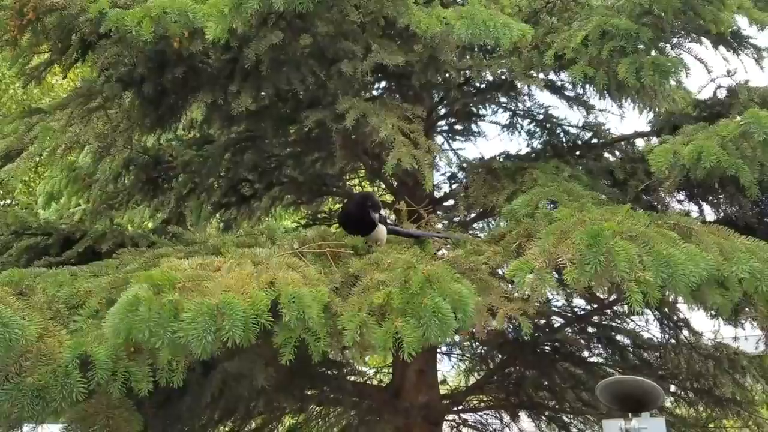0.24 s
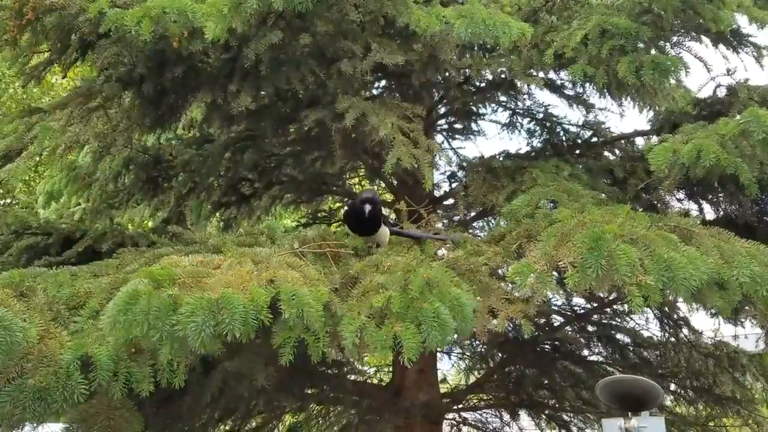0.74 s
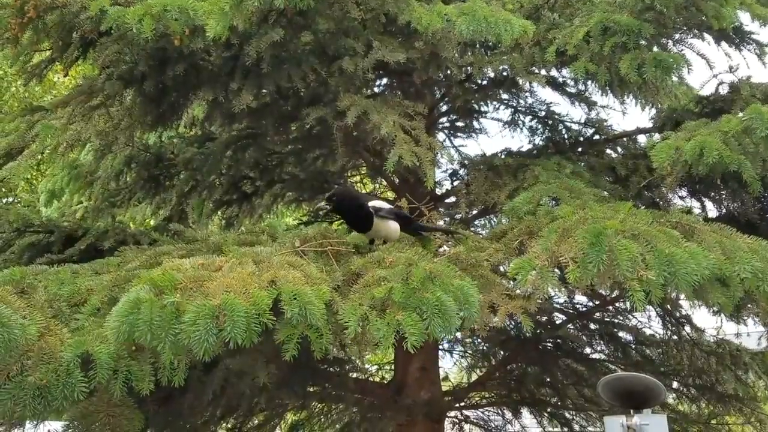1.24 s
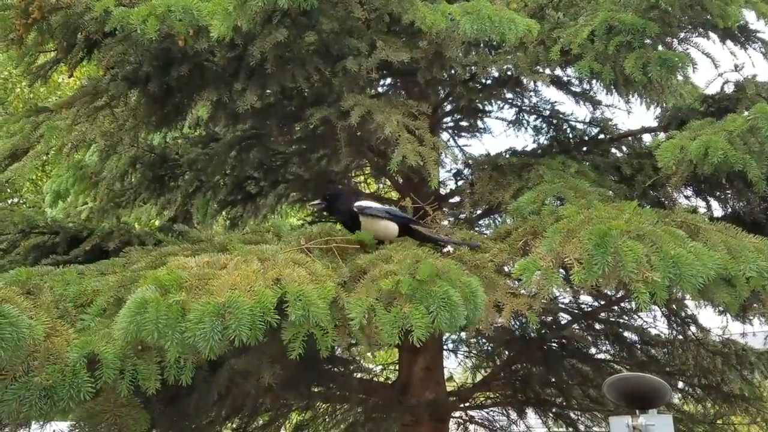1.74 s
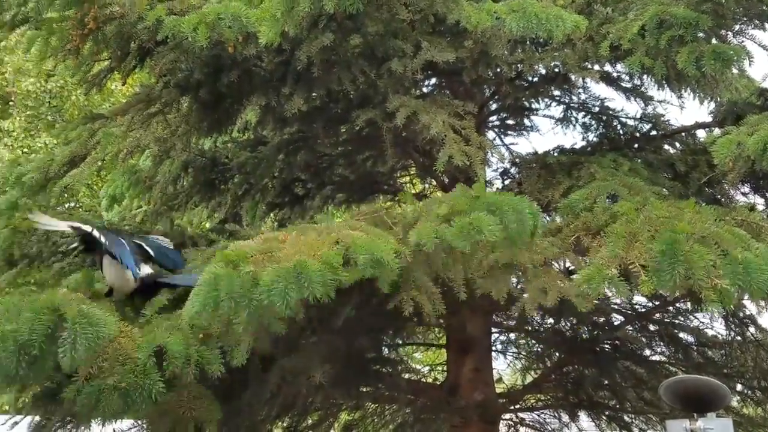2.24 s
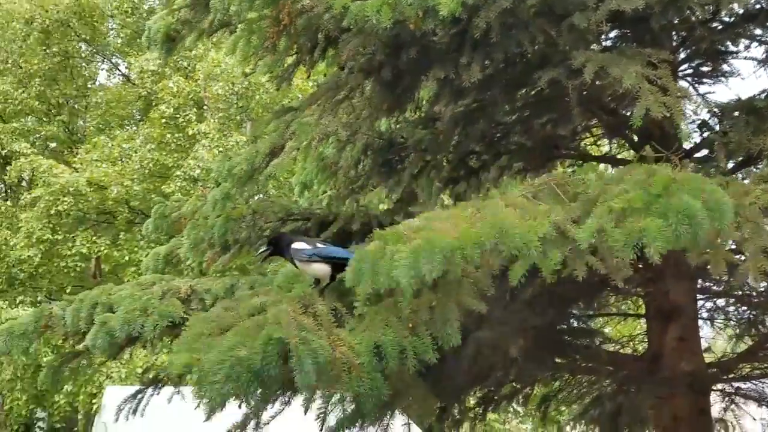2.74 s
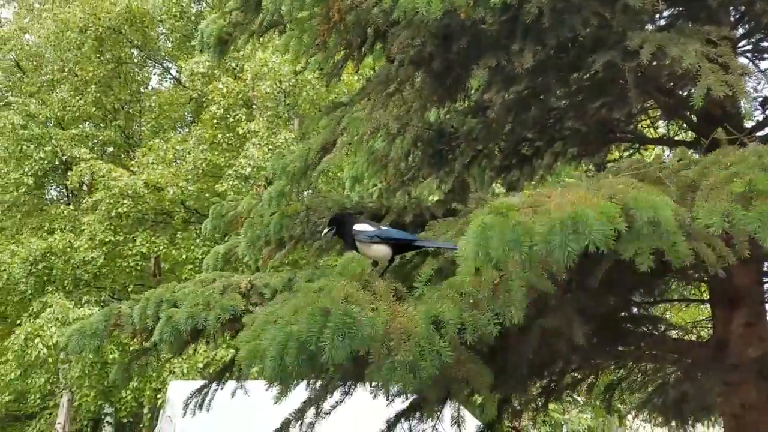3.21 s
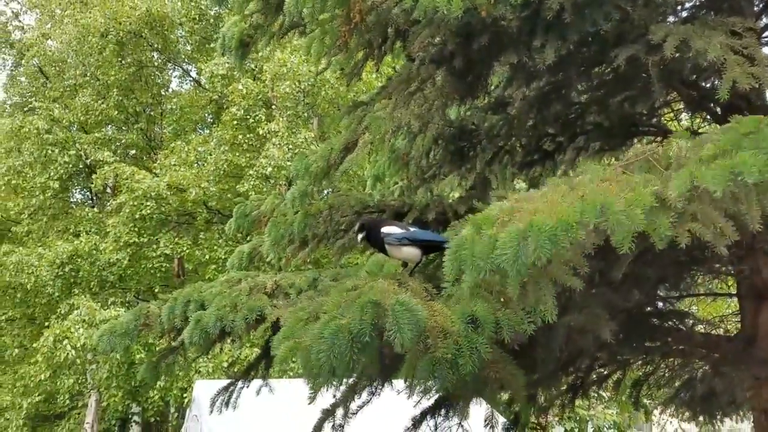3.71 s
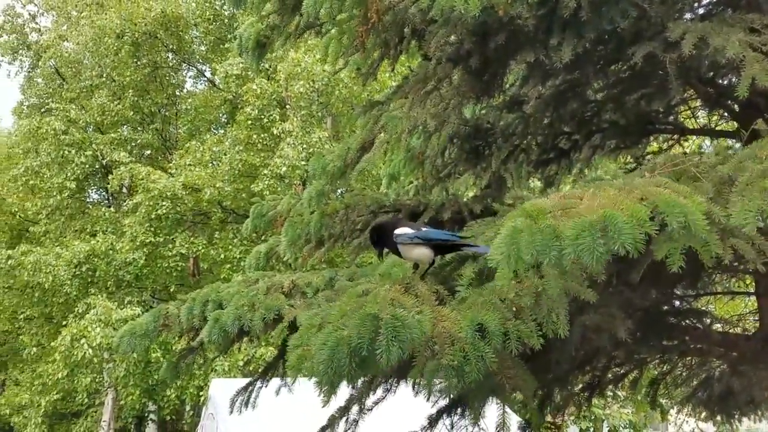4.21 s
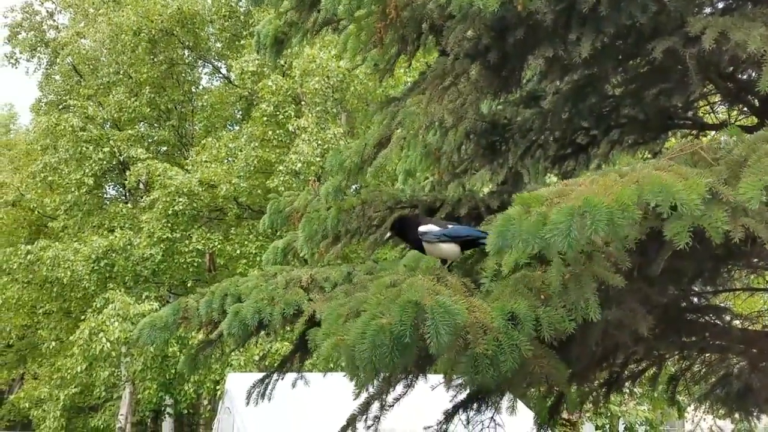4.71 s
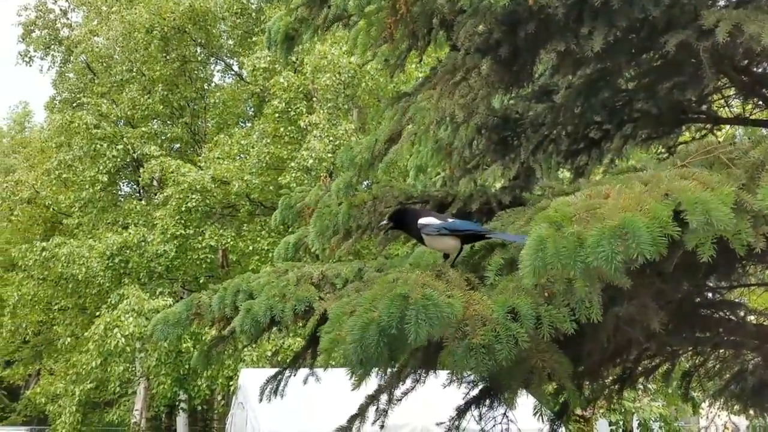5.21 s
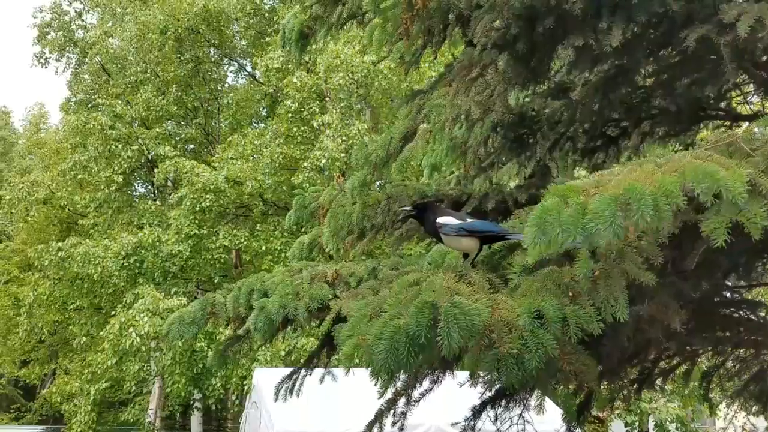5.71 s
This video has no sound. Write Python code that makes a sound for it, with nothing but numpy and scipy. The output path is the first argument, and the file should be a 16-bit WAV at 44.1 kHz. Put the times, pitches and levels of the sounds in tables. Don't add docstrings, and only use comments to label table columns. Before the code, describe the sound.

A magpie in a spruce chatters harshly in two runs while a fainter second one rattles farther off, over a low hum and soft town air.

```python
import sys
import numpy as np
from scipy import signal
from scipy.fft import rfft, irfft, next_fast_len
from scipy.io import wavfile
from scipy.ndimage import uniform_filter1d

SR = 44100
rng = np.random.default_rng(int(sys.argv[2]) if len(sys.argv) > 2 else 0)


def volts_from_decibels(level):
    exponent = np.asarray(level, float) / 20
    return 10 ** exponent


def store_wav(level_fs):
    pcm = np.round(np.clip(np.atleast_2d(level_fs), -1, 1) * 32767)
    wavfile.write(sys.argv[1], SR, pcm.T.astype(np.int16))


N = 262395

# start in seconds, length in seconds, level in dB,
# gain from the head turning toward the phone in dB, top pitch in Hz.
NEAR_CALLS = [(1.076, 0.17, -24, -1.5, 618), (1.314, 0.17, -24, -5, 698.6), (1.546, 0.17, -25.5, -6, 702.2),
              (1.766, 0.16, -24.5, -1.5, 709), (1.977, 0.15, -24.5, -5.5, 724.3),
              (2.223, 0.15, -25.5, -3.5, 687), (2.462, 0.15, -24, -4.5, 697),
              (2.690, 0.15, -24, -3.5, 676.6), (2.916, 0.15, -23, -0.9, 690.3),
              (3.146, 0.14, -23.5, -2, 700.3), (3.386, 0.15, -23.5, -1.5, 712),
              (5.084, 0.185, -26, -3.5, 662), (5.322, 0.15, -24, -2.5, 692), (5.536, 0.15, -24, -2, 734),
              (5.776, 0.14, -24, -2, 714.3)]
# start in seconds, level in dB.
FAR_CALLS = [(0.695, -42), (.916, -37.5), (1.135, -36), (1.355, -39), (1.575, -36.5), (1.794, -38.5),
             (2.015, -36), (2.245, -35.5), (2.474, -36), (2.704, -38)]
# frequency in Hz, width in Hz, level in dB.
WINDPIPE_MODES = [(968, 260, -12), (1393, 372, -10.5), (1960, 770, -3.5)]
# frequency in Hz, width in Hz, level in dB.
NEAR_BEAK_MODES = [(4890, 1560, -3), (8330, 1850, -2.5), (11170, 530, -17), (13300, 5400, -24)]
FAR_BEAK_MODES = [(4870, 1870, -5), (7390, 2800, -6.5), (10440, 1600, -9.5), (13500, 3520, -20)]
# frequency in Hz, left minus right in dB.
PORT_LEVEL = [(60, 0.0), (92, -1.0), (140, -1.0), (210, 1.0), (330, 2.0), (500, 3.0), (770, 4.0),
              (1170, 5.0), (1790, 6.0), (2740, -1.5), (4190, -10.0), (6410, -6.5), (9810, -5.0),
              (15000, -1.5)]
# frequency in Hz, lead of the left in radians.
PORT_PHASE = [(0, 0), (860, 0.5), (3100, -0.5), (5430, 3.0), (6370, 2.0), (10100, 4.6), (12100, 9.6),
              (15500, 22.2), (15800, 19.3)]
# frequency in Hz, reverberation time T60 in seconds.
YARD_T60 = [(500, 0.46), (2000, 0.69), (5000, 0.53), (10000, 0.3)]
# time in seconds, level in dB.
MACHINE_LOAD = [(0.0, -50.5), (0.11, -44), (1.14, -47), (2.29, -42.5), (2.33, -45.5), (2.7, -43.5),
                (3.07, -48.5), (3.1, -43.5), (3.31, -49), (3.58, -41.5), (3.99, -46), (4.11, -41.5),
                (4.34, -49.5), (4.57, -43.5), (5.82, -43.5), (5.95, -49)]
# middle in seconds, peak in dB, half width in seconds.
SECOND_SWELLS = [(0.028, -48, 0.048), (2.22, -52, .06), (3.2, -51, 0.08), (3.53, -45, 0.053),
                 (3.84, -48.5, .15), (4.46, -46, 0.11), (4.9, -46, 0.13), (5.5, -73, .3)]
# multiple of half the main tone, level in dB, left minus right in dB.
WHINE_PARTIALS = [(5, -13, .4), (8, -10, 2.5), (9, -6, 3), (10, -8, 4), (11, -3, 5), (12, 0, 5),
                  (18, -17, 5), (24, -13, 5), (28, -15, 5)]
# time in seconds, level in dB.
WHINE_BREEZE = [(0, -51), (.3, -61.5), (.9, -55.5), (1.5, -50.5), (3.3, -54.5), (4.2, -49.5), (5.95, -49)]
# time in seconds, peak in dB, ring frequency in Hz.
TWIG_TICKS = [
    (0.049, -40.5, 6600),
    (0.415, -52, 4940),
    (0.4848, -52, 8240),
    (0.5094, -66, 5530),
    (0.563, -33.5, 8160),
    (0.5744, -42, 7960),
    (0.6174, -46, 8240),
]
# time in seconds, peak in dB.
NEEDLE_TICKS = [(4.4947, -62), (4.5069, -59), (4.5162, -54), (4.5236, -49), (4.5314, -61), (4.5471, -55),
                (4.5745, -50), (4.5856, -54), (4.5925, -50), (4.6064, -56)]
# frequency in Hz, density in dB per Hz.
EARLY_AIR = [(15, -58), (25, -22.5), (70, -42), (94, 2), (123, -16), (175, -17.5), (489, -18), (607, -18),
             (818, -26), (1480, -20), (6210, -49.5), (16000, -53.5)]
LATE_AIR = [(15, -53), (25, -16), (64, -8), (114, -3), (175, -9.5), (373, -16), (734, -12), (796, -17),
            (1480, -12), (2410, -21), (10100, -49.5), (16000, -44)]
# frequency in Hz, correlation as a plain number.
AIR_LIKENESS = [(60, 0.97), (130, 0.98), (290, 0.84), (640, 0.65), (1410, -0.05), (3100, 0.04),
                (6820, 0.01), (15000, -0.02)]
# frequency in Hz, left minus right in dB.
AIR_BALANCE = [(60, -1), (130, 3.5), (290, 1), (640, 8), (1410, 4.5), (3100, -2.5), (6820, -7), (15000, 3)]

# late swell dB, upper mode Hz, upper mode dB, fourth-partial pull dB, throat sweep dB, branch scatter dB
NEAR_BIRD = (-1.7, 2796, 3.5, -8, -17.5, -0.5)
FAR_BIRD = (3, 3042, -2.5, -9, -26, 3.5)
FAR_LENGTH_S, FAR_TURN_DB, FAR_HZ = .21, -4.5, 645.3
LEAD_IN_S = .006
UPPER_WIDTH_HZ, TUNED_WIDTH_HZ = 577, 400
ATTACK, ATTACK_DB, SWELL_DB, RELEASE, RELEASE_DB = 0.27, -11.5, 4.5, .22, -10
STRETCH_LAG, PITCH, BEAK_SHIFT, THROAT_HZ = 1.15, (.6, 1.04), (.97, 1.06), (2500, 5700)
RATTLE, ROUGH, ROUGH_RELEASE = (.7, .14), (.6, .22), .22
SOFT_START = .6
BEAK_OPEN, THROAT_OPEN = (0.72, 2, -8.5, -5), (.62, 0, -50, -20)
BLOOM_DB = (-3.5, 2.5)
WALL_S = .185
MAIN_HZ, DRIFT_HZ, SECOND_HZ, SECOND_DB = 122, .25, 98.5, -62.5
WHINE_SHARE = 0.17
NEEDLE_HZ = 8400
EARLY_DB, LATE_DB = -44.5, -43.5


def magpies():
    far_calls = [(s, FAR_LENGTH_S, db, FAR_TURN_DB, FAR_HZ) for s, db in FAR_CALLS]
    both = bird(NEAR_CALLS, (*NEAR_BIRD, NEAR_BEAK_MODES)) + bird(far_calls, (*FAR_BIRD, FAR_BEAK_MODES))
    delayed = np.pad(resonate(both[1], 5600, 600), (round(WALL_S * SR), 0))[:N]
    yard = volts_from_decibels(-22.5) * scatter(both[1], start=0.036, t60_share=1.0)
    return ports(both + yard + volts_from_decibels(-31) * delayed)


def bird(calls, traits):
    out = np.zeros((N, 2))
    for row in calls:
        s, sound = chatter(*row, *traits)
        add(out, s, sound.T)
    return out.T


def chatter(s, length, db, beam_db, top_hz, swell_db, upper_hz, upper_db, tuned_db,
            sweep_db, branch_db, beak_modes):
    leaves = rng.standard_normal((3, 2, 5000))
    n = round(np.clip(length + LEAD_IN_S, .1, .26) * SR)
    share = np.arange(n) / n
    stretch = np.sin(np.pi / 2 * share ** STRETCH_LAG) ** 2
    starting = np.maximum(1 - share / ATTACK, 0)
    ending = np.maximum(1 - (1 - share) / RELEASE, 0)
    effort_db = ATTACK_DB * starting + SWELL_DB * stretch + RELEASE_DB * ending ** 2

    pitch_hz = top_hz * between(PITCH, stretch)
    rattle = between(RATTLE, stretch) * (1 - SOFT_START * starting)
    rough = between(ROUGH, stretch) + ROUGH_RELEASE * ending
    voiced, breathy, tone = syrinx(pitch_hz, rattle, rough)

    beak = between(BEAK_SHIFT, share ** 2)
    upper_gain = volts_from_decibels(upper_db + between(BLOOM_DB, stretch ** 3))
    pipe = modes(voiced, WINDPIPE_MODES, beak)
    pipe = pipe - upper_gain * resonate(voiced, upper_hz * beak, UPPER_WIDTH_HZ)
    pipe = steadied(pipe + volts_from_decibels(tuned_db) * resonate(voiced, 4 * pitch_hz, TUNED_WIDTH_HZ))

    throat_hz = between(THROAT_HZ, stretch ** 1.6)
    throat = volts_from_decibels(arch(share, *THROAT_OPEN)) * resonate(breathy, throat_hz, 1100)
    mouth = steadied(modes(breathy, beak_modes, beak, beam_db))
    mouth_gain = volts_from_decibels(arch(share, *BEAK_OPEN) - 4.0) * volts_from_decibels(0.13 * beam_db)
    voice = pipe + evened(throat) * volts_from_decibels(sweep_db) + mouth_gain * mouth + tone
    voice = volts_from_decibels(db + effort_db + swell_db * (share - 1.5)) * voice * signal.windows.tukey(n, .16)
    return s - LEAD_IN_S, branches(voice, leaves, branch_db)


def syrinx(pitch_hz, rattle, rough):
    n = len(pitch_hz)
    noise = rng.standard_normal((4, 12000))
    waver = evened(uniform_filter1d(uniform_filter1d(noise[0], 90), 90))[:n]
    turns = np.cumsum(pitch_hz * (1 + .2 * rough * waver)) / SR
    size = volts_from_decibels(9 * rough * np.clip(noise[1], -2, 1.5)[np.round(turns).astype(int)])
    pulses = sum(np.cos(2 * np.pi * k * turns + .35 * k * k) for k in range(1, 16))
    pulses = steadied(size * pulses)
    puffs = steadied(size * (0.32 + np.exp(-(turns % 1) / 0.76)) * noise[2, :n])
    beat_waver = evened(uniform_filter1d(noise[3], 500))[:n]
    beat = .5 + np.cumsum(112 * (1 + 0.164 * beat_waver)) / SR
    chop = 1 - rattle * (1 - np.exp(-(beat % 1) / .4)) * 1.15
    chop = uniform_filter1d(chop, size=60) / (1 - 0.38 * rattle)
    voiced = chop * (np.sqrt(1 - rough ** 2) * pulses + rough * puffs)
    breathy = chop * (0.3 * pulses + 1.8 * puffs)
    tone = volts_from_decibels(-10.0 - 36 * rattle) * size * np.sin(2 * np.pi * turns)
    return voiced, breathy, tone


def modes(x, table, shift, beam_db=0):
    out = 0
    for k, (hz, width, db) in enumerate(table):
        gain = (-1) ** k * volts_from_decibels(db + beam_db * (k > 0))
        out = out + gain * resonate(x, hz * shift, width)
    return out


def branches(voice, noise, branch_db):
    t = np.arange(noise.shape[2]) / SR
    tails = noise * volts_from_decibels(-60 * t / 0.15) * (t > .0006)
    tails *= volts_from_decibels(branch_db) / np.linalg.norm(tails, axis=2, keepdims=True)
    turn_phase = 2 * np.pi * (7 * np.arange(len(voice)) / SR + np.arange(3)[:, None] / 6)
    turns = voice * np.cos(turn_phase) * np.sqrt(2 / 3)
    scattered = signal.fftconvolve(turns[:, None], tails, axes=2).sum(0)
    return scattered + np.pad(voice, (0, len(t) - 1))


def scatter(x, start, t60_share):
    taps = np.zeros((2, SR // 2))
    grid = np.arange(0, SR // 2 - 20, 20)
    at = grid + rng.integers(0, 20, (2, len(grid)))
    np.put_along_axis(taps, at, rng.choice([-1., 1.], at.shape), 1)
    hz, t, z = signal.stft(taps, SR, nperseg=128)
    decay = volts_from_decibels(-60 * t / (t60_share * read(YARD_T60, hz))[:, None])
    tail = signal.istft(z * decay, SR, nperseg=128)[1]
    tail = np.pad(tail, ((0, 0), (round(start * SR), 0))) / np.linalg.norm(tail[0])
    return signal.fftconvolve(x[None], tail, axes=1)[:, :N]


def ports(pair):
    size = next_fast_len(N)
    hz = np.fft.rfftfreq(size, 1 / SR)
    half = volts_from_decibels(read(PORT_LEVEL, hz) / 2) * np.exp(.5j * np.interp(hz, *np.transpose(PORT_PHASE)))
    return irfft(rfft(pair, size) * [half, 1 / half], size)[:, :N]


def twigs():
    out, t = np.zeros(N), np.arange(600) / SR
    ticks = TWIG_TICKS + [(s, db, NEEDLE_HZ) for s, db in NEEDLE_TICKS]
    for (s, db, hz), puff in zip(ticks, rng.standard_normal((len(ticks), 600))):
        add(out, s, volts_from_decibels(db - 1.0 - 60 * t / 0.015) * evened(resonate(puff, hz, 2800)))
    return ports(out + volts_from_decibels(-17) * scatter(out, start=.002, t60_share=.05))


def machine():
    t = np.arange(N) / SR
    main_db = np.interp(t, *np.transpose(MACHINE_LOAD))
    whine_db = np.interp(t, *np.transpose(WHINE_BREEZE)) + WHINE_SHARE * (main_db - main_db.mean())
    shaft = np.pi * np.cumsum(MAIN_HZ + DRIFT_HZ * wander(N, samples=6000)) / SR
    out = volts_from_decibels(main_db + 0.4 * wander(N, samples=1500)) * np.sin(2 * shaft)
    swells = sum(volts_from_decibels(db) * np.exp(-((t - s) / half) ** 2) for s, db, half in SECOND_SWELLS)
    second = steadied(resonate(rng.standard_normal(N), SECOND_HZ, 4.77)) / np.sqrt(2)
    out = out + (volts_from_decibels(SECOND_DB) + swells) * second
    out = out * volts_from_decibels([[-.6], [.6]])
    for k, db, lean_db in WHINE_PARTIALS:
        level_db = whine_db + db + 2.2 * wander(N, samples=7000)
        gain = volts_from_decibels(level_db + np.array([[lean_db], [-lean_db]]) / 2)
        out = out + gain * np.sin(k * shaft + 2 * np.pi * rng.random())
    return np.sqrt(2) * out


def air():
    frames, hz = N // 256 + 5, np.fft.rfftfreq(1024, 1 / SR)
    a, b, c, d, patches = rng.standard_normal((frames, 513, 5)).T
    patches = evened(uniform_filter1d(uniform_filter1d(patches, 10, 0), 14, 1))
    early_db = air_colour(EARLY_AIR, EARLY_DB, hz)
    late_db = air_colour(LATE_AIR, LATE_DB, hz)
    later = np.clip(np.arange(frames) * 256 / SR / 1.7, 0, 1)
    same = np.clip(read(AIR_LIKENESS, hz) + .02 * (hz < 60), -1, 1)[:, None]
    left = a + 1j * b
    z = np.array([left, same * left + np.sqrt(1 - same ** 2) * (c + 1j * d)])
    z *= volts_from_decibels(np.outer(early_db, 1 - later) + np.outer(late_db, later) + 1.5 * patches)
    z *= volts_from_decibels(np.multiply.outer([.5, -.5], read(AIR_BALANCE, hz)))[:, :, None]
    return signal.istft(z, nperseg=1024, noverlap=768)[1][:, :N]


def air_colour(points, level_db, hz):
    shape_db = read(points, hz)
    return level_db + shape_db - 20 * np.log10(np.linalg.norm(volts_from_decibels(shape_db)))


def resonate(x, hz, width):
    turn = np.exp(2j * np.pi * np.cumsum(hz * np.ones(len(x))) / SR)
    r = np.exp(-np.pi * width / SR)
    return 2 * (turn * signal.lfilter([(1 - r) ** 2], [1, -2 * r, r * r], x / turn)).real


def steadied(x):
    return x / np.sqrt(uniform_filter1d(x ** 2, 1100) + 1e-12)


def evened(x):
    return x / np.sqrt(np.mean(x ** 2) + 1e-20)


def wander(count, samples):
    return evened(uniform_filter1d(uniform_filter1d(rng.standard_normal(count), samples), samples))


def between(ends, share):
    return ends[0] + (ends[1] - ends[0]) * share


def arch(share, top, peak_db, fall_db, floor_db):
    return np.maximum(peak_db + fall_db * 4 * (share - top) ** 2, floor_db)


def read(points, hz):
    f, value = np.transpose(points)
    return np.interp(np.log(hz + 1), np.log(f + 1), value)


def add(mix, s, sound):
    part = mix[round(s * SR):][:len(sound)]
    part += sound[:len(part)]


def scene():
    return magpies() + twigs() + machine() + air()


def roll_off(x):
    return signal.sosfilt(signal.butter(12, 15840, fs=SR, output="sos"), x)


def record(dry):
    rounded = np.tanh(dry / 1.05) * 1.05
    heard = signal.sosfilt(signal.butter(12, 15400, fs=SR, output="sos"), rounded)
    return roll_off(heard)


dry = scene()
out = record(dry)
store_wav(out)
```